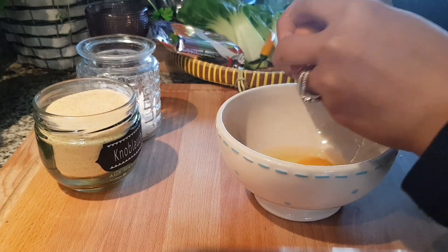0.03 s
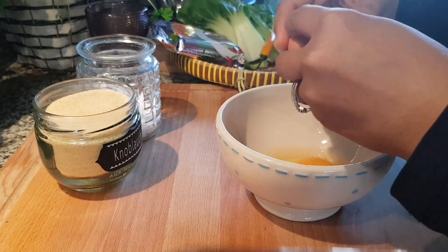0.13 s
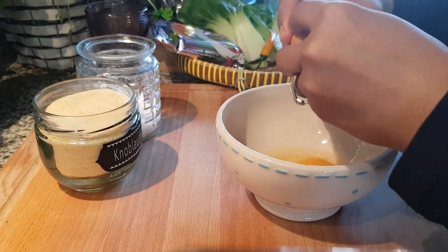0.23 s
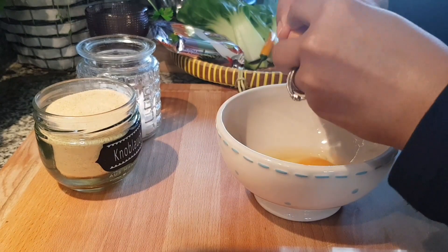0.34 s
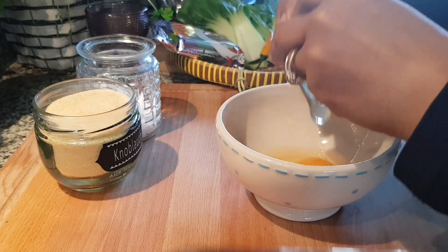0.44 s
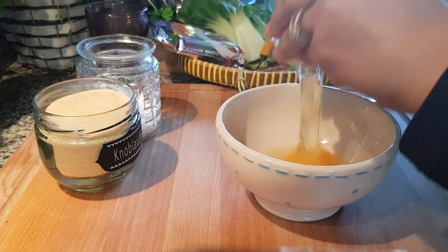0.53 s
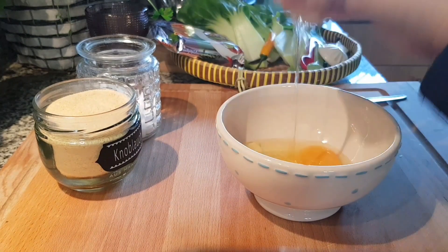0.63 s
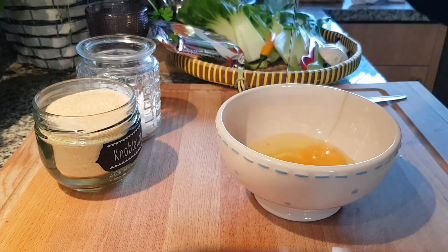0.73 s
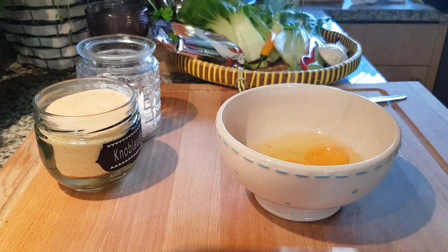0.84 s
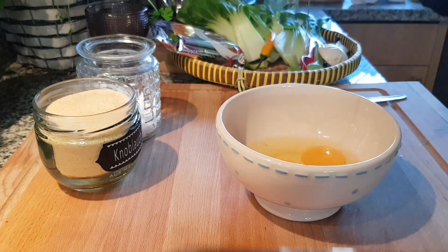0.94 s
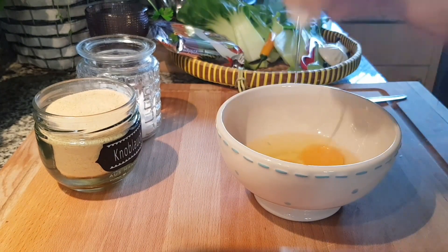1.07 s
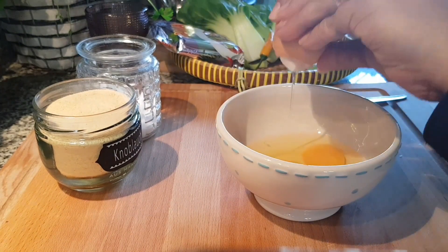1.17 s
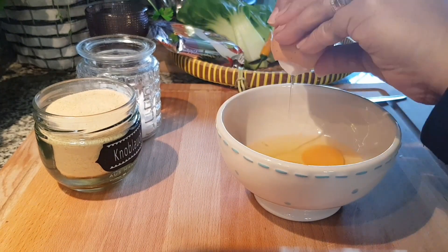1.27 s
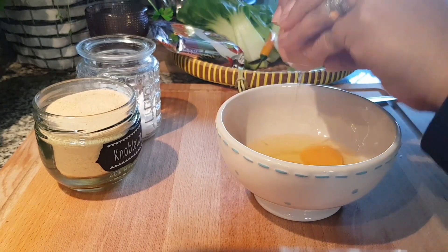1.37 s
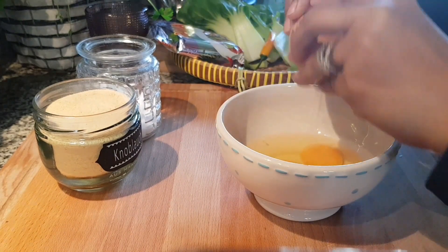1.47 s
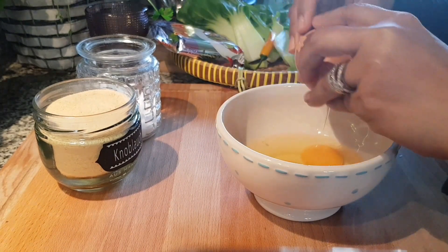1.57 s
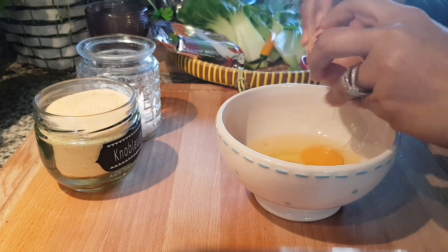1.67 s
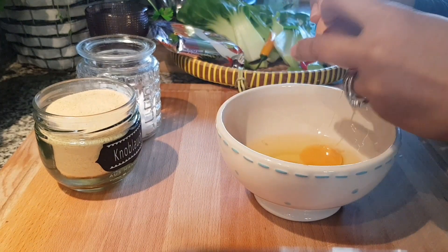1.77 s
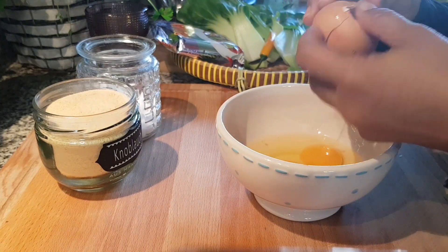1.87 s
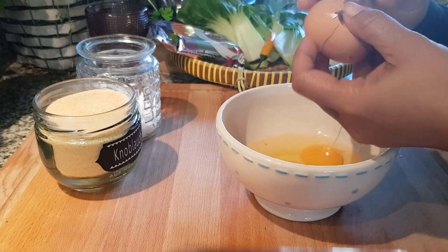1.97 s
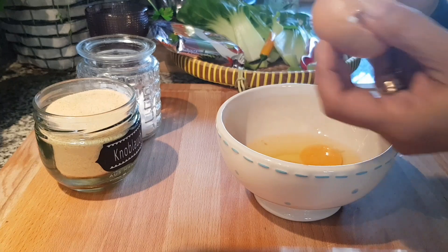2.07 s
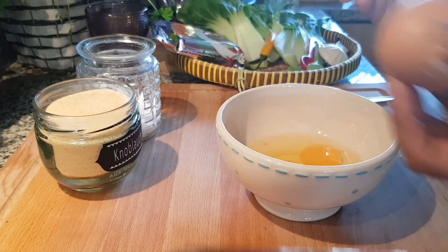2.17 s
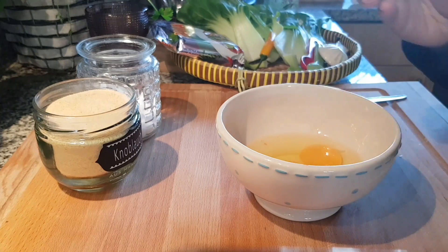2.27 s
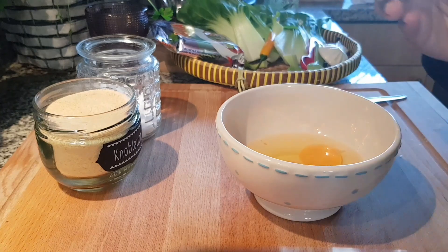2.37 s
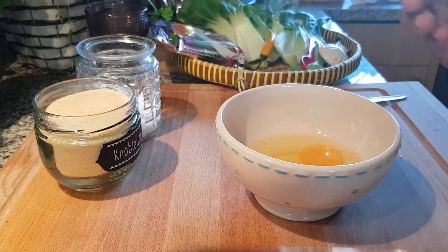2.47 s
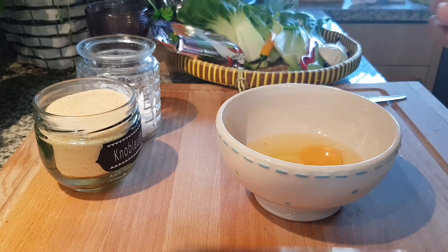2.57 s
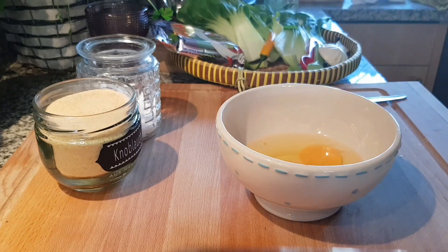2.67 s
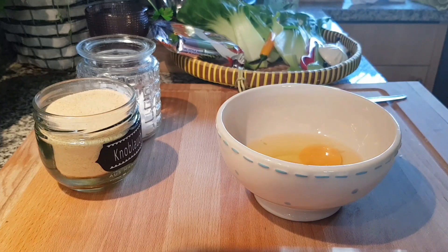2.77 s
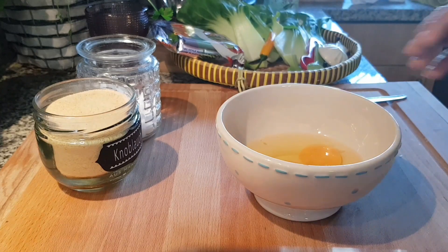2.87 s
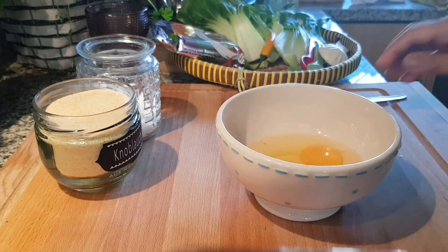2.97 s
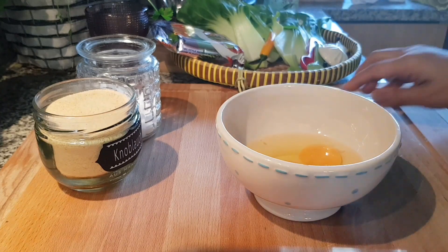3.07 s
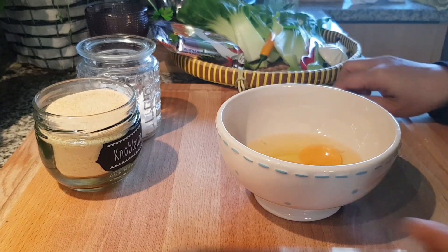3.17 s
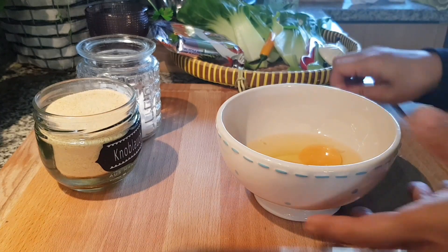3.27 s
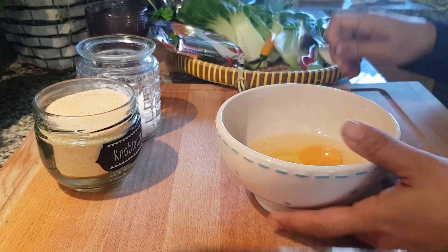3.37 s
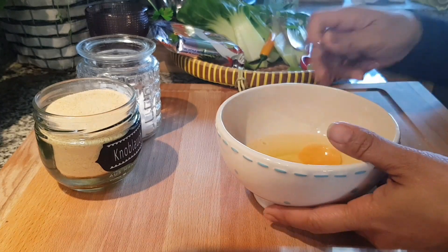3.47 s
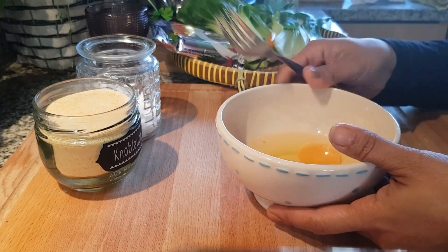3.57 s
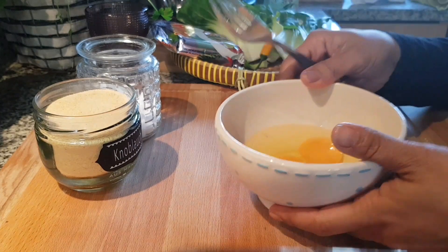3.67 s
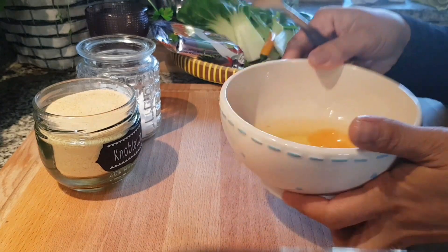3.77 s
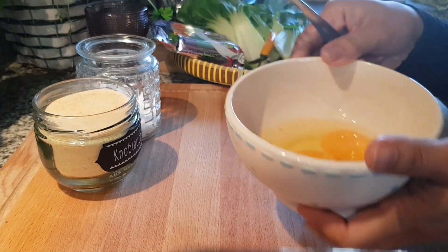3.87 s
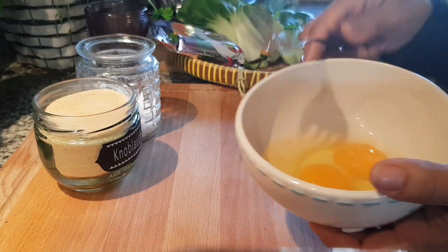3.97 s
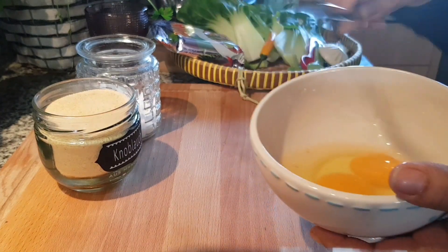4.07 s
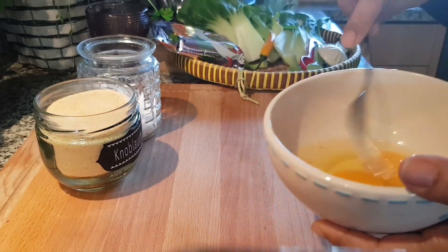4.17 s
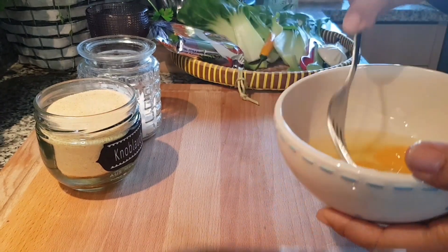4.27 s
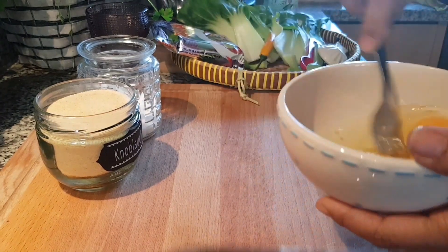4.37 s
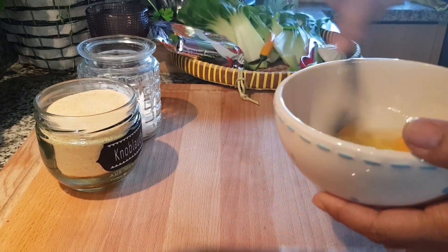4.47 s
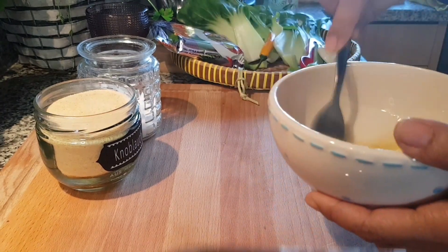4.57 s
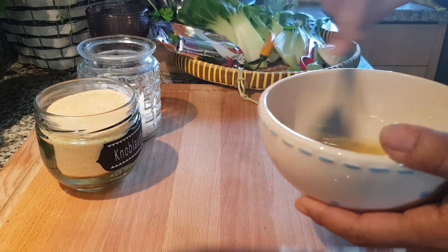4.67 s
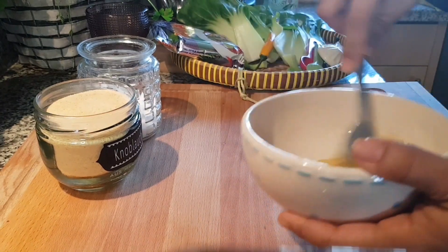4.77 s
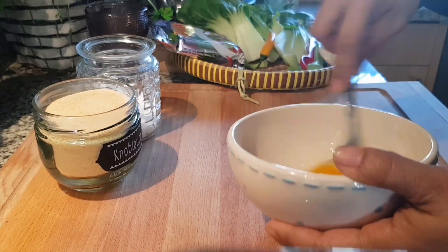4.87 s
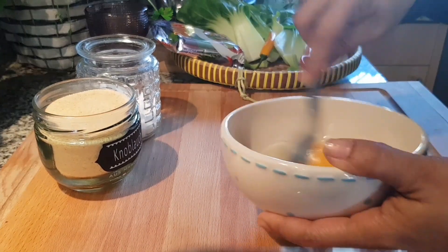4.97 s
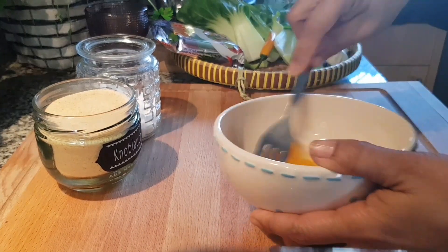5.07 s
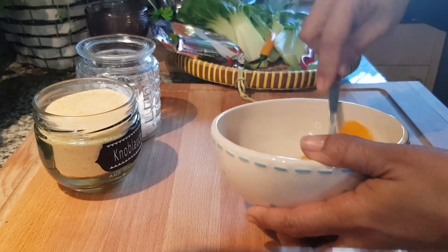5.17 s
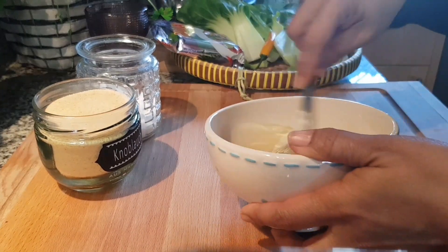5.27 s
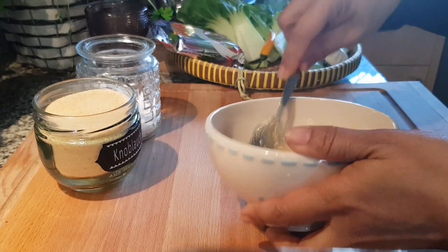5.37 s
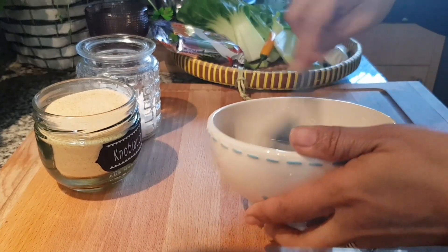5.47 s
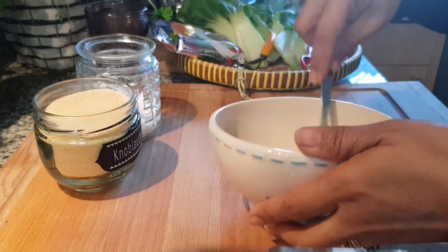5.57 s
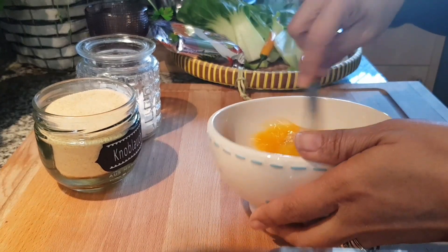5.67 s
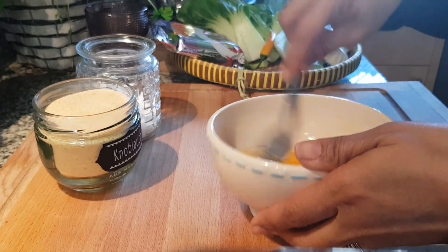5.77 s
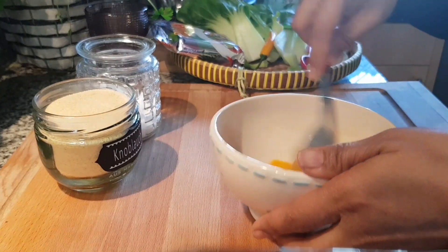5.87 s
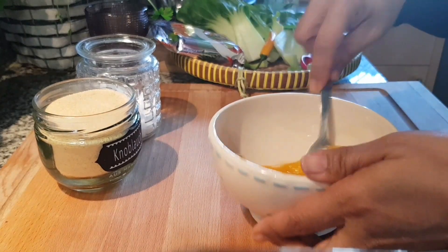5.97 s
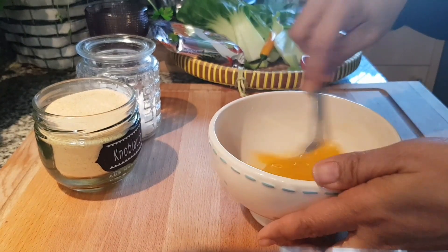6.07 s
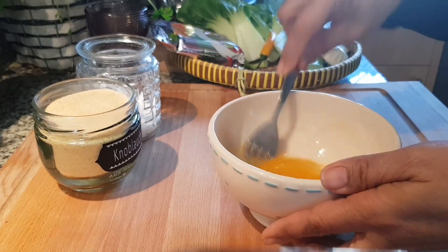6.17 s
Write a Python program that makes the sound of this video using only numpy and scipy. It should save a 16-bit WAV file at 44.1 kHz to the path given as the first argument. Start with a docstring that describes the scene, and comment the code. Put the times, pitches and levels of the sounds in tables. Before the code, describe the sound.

Fingers pull an eggshell apart with small, soft snaps, and the white drains out with a few little plops. Light taps and rubbing follow as the shell is set down. Then a fork beats the eggs in a ceramic bowl, much louder, with fast clicks, scrapes, brief ringing and wet sloshing, while the bowl knocks on a wooden board. Everything is heard close up in a small, quiet kitchen.

```python
"""A fork beats eggs in a ceramic bowl: its tines click, scrape and ring on the glaze, the egg sloshes,
air pockets plop, and the tilted bowl knocks its foot on a wooden board. Before the beating starts,
fingers pull an eggshell apart with small snaps, let the white run out and set the shell down.
All of it is heard from close by in a small, quiet kitchen."""
import sys
import numpy as np
from scipy import signal
from scipy.fft import rfft, irfft
from scipy.io import wavfile

SR = 44100
rng = np.random.default_rng(int(sys.argv[2]) if len(sys.argv) > 2 else 0)


def generate_wav(sig):
    """Save sig (samples, or channels by samples) to the path in sys.argv[1] as 16-bit PCM at SR."""
    pcm = np.round(np.clip(np.atleast_2d(sig).T, -1, 1) * 32767).astype(np.int16)
    wavfile.write(sys.argv[1], SR, pcm)


N = 273861
TIME = np.arange(N) / SR  # seconds since the scene began
AGE = np.arange(int(.3 * SR)) / SR  # seconds since one short sound began

# The tones that fork and bowl ring with: (pitch [Hz], level [dB], fade time [s]).
# A fade time, called t60 in the code, is how long a sound takes to drop by 60 dB.
FORK_TONES = [(2295, -10, .18), (2385, -10, .13), (3060, -10, .13), (3350, -12, .09), (4037, -11, .16),
              (4243, -8, .17), (5000, -10, .12), (5235, -8, .16), (5500, -11, .12), (6050, -6, .12),
              (6204, -6, .13), (6500, -7, .1), (6720, -4, .13), (6775, -2, .18), (7220, -1, .2),
              (7420, -9, .1), (7570, -8, .14), (7916, -3, .17), (8150, -7, .15), (8725, -12, .14),
              (9560, -12, .13), (10230, -12, .13), (10950, -11, .13), (11550, -13, .12), (12810, -14, .11),
              (14520, -14, .11)]
# how strong the lows and highs of a fork in wet egg are: (frequency [Hz], level [dB])
FORK_COLOUR = [(410, -5), (700, -16.5), (971, -11.5), (1120, -5), (1230, 0), (1840, -11.5), (2080, 1.5),
               (2560, -3.5), (3410, -5.5), (4210, -6.5), (4610, -4), (6570, 0), (9110, 1), (14800, 16),
               (16000, 9)]
# the same for eggshell: (frequency [Hz], level [dB])
SHELL_COLOUR = [(290, -60), (500, -9), (1340, -13.5), (1690, -8), (2040, -9.5), (2430, -11), (4090, -7),
                (4800, -5.5), (8090, -15), (14000, -6), (16000, 7)]
# the fork hits or drags along the bowl's wall:
# (time [s], contact length [s], level [dB], clack pitch [Hz], ringing level [dB])
STRIKES = [(4.387, 0.0048, -23.5, 7400, -47), (4.531, 0.019, -38, 7900, -46.5),
           (4.639, 0.0048, -21.5, 7900, -67), (4.774, 0.008, -22, 7000, -66),
           (4.868, 0.012, -33, 5900, -49), (4.892, .004, -17.5, 6500, -29.5),
           (5.037, 0.026, -36, 6460, -46), (5.182, 0.00091, -16.5, 6800, -56),
           (5.314, 0.0054, -30, 5030, -57), (5.382, 0.0024, -32.5, 2680, -52),
           (5.404, 0.0068, -29, 6270, -51), (5.457, 0.0062, -41, 5200, -47),
           (5.578, 0.021, -31.5, 6020, -42.5), (5.724, 0.004, -31, 7940, -69),
           (5.842, 0.0039, -18, 6540, -49), (5.9319, 0.0052, -16.5, 6130, -37),
           (5.982, 0.004, -19.5, 6630, -54), (6.068, 0.039, -33, 6200, -56)]
# the fork's tips flick through the egg, light and bright: (time [s], level [dB])
FLICKS = [(4.37, -46.5), (4.463, -38.5), (4.486, -39), (4.498, -32), (4.627, -46), (4.71, -49),
          (4.735, -52), (4.753, -44), (4.901, -40), (5.022, -38), (5.144, -35.5), (5.281, -36.5),
          (5.397, -38.5), (5.531, -39), (5.555, -36.5), (5.667, -44), (5.679, -40), (5.798, -38.5),
          (5.817, -40), (5.961, -42)]


def undb(db):
    """Turn decibels into a factor to multiply a sound by."""
    return 10 ** (np.asarray(db) / 20)


def unit(x):
    """Scale a sound so that its average strength (rms) is 1."""
    return x / np.sqrt(np.mean(x ** 2))


def colour(x, points, lo_hz=15, hi_hz=20000):
    """Shape a sound by (frequency [Hz], level [dB]) points, cut it below and above, set strength 1."""
    f = np.maximum(np.fft.rfftfreq(x.shape[-1], 1 / SR), 1)
    hz, db = np.transpose(points)
    curve = undb(np.interp(np.log(f), np.log(hz), db))
    edges = ((1 + (lo_hz / f) ** 12) * (1 + (f / hi_hz) ** 12)) ** -.5
    return unit(irfft(rfft(x) * curve * edges, x.shape[-1]))


def noise(width, size=len(AGE)):
    """Stereo noise; width says how much left and right differ."""
    middle, side = rng.standard_normal((2, size))
    return unit(np.array([middle + width * side, middle - width * side]))


def resonate(x, hz, width_hz):
    """Keep the part of a sound near one pitch, at strength 1."""
    b, a = signal.iirpeak(hz, hz / width_hz, fs=SR)
    return unit(signal.lfilter(b, a, signal.lfilter(b, a, x)))


def uneven(x, count=56):
    """Each spot that is hit favours its own random set of frequencies."""
    spectrum = rfft(x)
    ripple_db = 5 * np.clip(rng.standard_normal(count), -2, 2)
    curve_db = np.interp(np.linspace(0, 1, spectrum.shape[1]), np.linspace(0, 1, count), ripple_db)
    return irfft(spectrum * undb(curve_db), x.shape[1])


def contact(length, t60):
    """The force of a hit: it rises fast, holds while the surfaces chatter, then dies away."""
    rise = 1 - np.exp(-AGE / .0005)
    return rise * undb(-60 * np.maximum(AGE - length, 0) / t60)


def swells(moves, attack_s, release_s):
    """Loudness of movements (time [s], length [s], level [dB]) that each rise, hold and die away."""
    power = np.zeros(N)
    for s, length, db in moves:
        i, j = np.searchsorted(TIME, [s - attack_s, s + length + release_s])
        age = TIME[i:j] - s
        rise = np.minimum(1 + age / attack_s, 1) ** 2
        fall = undb(db - 60 * np.maximum(age - length, 0) / release_s)
        power[i:j] += (rise * fall) ** 2
    return np.sqrt(power)


def grains(rate, t60):
    """Tiny bursts of noise at random times, about rate per second, a few much louder than the rest."""
    size = undb(4 * np.minimum(rng.exponential(size=N), 3))
    sparks = (rng.random(N) < rate / SR) * size ** 2
    power = signal.fftconvolve(sparks, undb(-120 * AGE / t60))[:N]
    return np.sqrt(np.abs(power)) * noise(.7, N)


def ring(tones, length, spread, scatter_db):
    """Tones build up during a hit, in a new mix each time; spread puts left and right out of step."""
    hz, db, t60 = np.transpose(tones)[:, :, None]
    size, detune, apart, start = rng.standard_normal((4, len(hz), 1))
    phase = 2 * np.pi * (hz * (1 + .001 * detune) * AGE + start)
    fade = undb(db + scatter_db * size - 60 * np.maximum(AGE - length, 0) / t60)
    channels = [(fade * np.sin(phase + ear * spread * apart)).sum(axis=0) for ear in (1, -1)]
    return np.array(channels) * np.minimum(AGE / length, 1)


def free_tones(favoured_hz, db, drop_db_per_octave, sustain=1.56):
    """Left free, fork and bowl ring longer; tones far from the pitch a touch favours are weaker."""
    tones = [(hz, db - drop_db_per_octave * abs(np.log2(hz / favoured_hz)), sustain * t60)
             for hz, _, t60 in FORK_TONES]
    return [tone for tone in tones if tone[1] > db - 40]


def add(track, s, sound, pan_db=0):
    """Mix a short sound into the track at s seconds; a positive pan_db moves it to the left."""
    i = max(int(s * SR), 0)
    track[:, i:i + len(AGE)] += (sound * undb([[pan_db / 2], [-pan_db / 2]]))[:, :N - i]


def from_left(x, delay_samples=5):
    """A sound from the left reaches the right channel a moment later."""
    return np.array([x[0], np.roll(x[1], delay_samples)])


def background():
    """A low rumble, a wide hiss and the faint hum of an appliance."""
    # the lows and highs of the quiet kitchen: (frequency [Hz], level [dB])
    quiet_colour = [(15, -61), (25, -14.5), (49, 3.5), (70, -8), (102, -0.5), (161, -17.5), (285, -26),
                    (317, -24.5), (659, -27.5), (911, -35), (1520, -40.5), (3820, -54), (6210, -40.5),
                    (7710, -49), (16000, -31.5)]
    rumble = signal.sosfilt(signal.butter(4, 300, fs=SR, output="sos"), noise(.17, N))
    hiss = colour(noise(.6, N), [(20, 0), (20000, 0)], lo_hz=300)
    hum = undb(-72.5) * np.sin(2 * np.pi * 100 * TIME)
    lean_left = undb([[.6], [-.6]])
    return undb(-55.5) * colour(rumble + hiss, quiet_colour) * lean_left + hum


def room(dry):
    """The kitchen's short echo: high sounds die first, and low ones are alike on both sides."""
    # how long the echo lasts: (frequency [Hz], fade time [s])
    fade_times = [(100, 0.24), (500, 0.2), (2000, 0.17), (7000, 0.14), (15000, 0.1)]
    hz, t60 = np.transpose(fade_times)
    f, t, (middle, side) = signal.stft(rng.standard_normal((2, len(AGE))), SR, nperseg=256)
    side = side * np.minimum(f / 600, 1)[:, None]
    fade = undb(-60 * t / np.interp(f, hz, t60)[:, None])
    echo = signal.istft(np.array([middle + side, middle - side]) * fade, SR)[1][:, :len(AGE)]
    echo = colour(echo, [(100, 3), (600, -11), (2000, -11.5), (7000, -10), (16000, -4.5)])
    echo *= np.clip((AGE - .003) / .00067, 0, 1)  # the echo arrives after 3 ms
    return signal.fftconvolve(dry, unit(echo) / np.sqrt(len(AGE)), axes=1)[:, :N]


def hands(attack_s=.052, release_s=.14):
    """Fingers rub, squeezed shell crackles, and the worktop thuds softly under whatever slides."""
    # fingers squeeze and pull at the shell: (time [s], length [s], level [dB])
    squeezes = [(.285, 0.037, -43), (.385, 0.069, -45.5), (.46, 0.073, -50), (.58, 0.018, -48.5),
                (.72, .02, -49.5), (.81, 0.026, -54.5), (1.31, .015, -55), (1.365, 0.031, -48.5),
                (1.47, 0.011, -47), (1.55, .1, -59.5), (1.74, .06, -52), (1.84, 0.037, -52.5),
                (1.92, 0.13, -62.5), (2.67, 0.047, -55.5), (2.94, 0.044, -50)]
    # hands and things slide on the worktop: (time [s], length [s], rubbing [dB], thud [dB])
    slides = [(0.014, 0.17, -50, -59.5), (0.596, 0.075, -51, -63), (0.87, 0.087, -73, -58),
              (2.073, 0.044, -82, -58), (2.33, 0.094, -68, -73), (2.794, 0.024, -40, -46.5),
              (2.915, 0.19, -52, -50.5), (3.116, 0.11, -51.5, -58.5), (3.258, 0.12, -52.5, -58),
              (3.42, 0.11, -63.5, -62.5), (3.765, 0.17, -71, -59), (4.287, 0.17, -75, -59)]
    squeeze = swells(squeezes, attack_s, release_s) + undb(-72.5)  # hands are never quite still
    slide = swells([(s, length, db) for s, length, db, _ in slides], attack_s, release_s)
    weight = swells([(s, length, db) for s, length, _, db in slides], attack_s, release_s)
    rub = colour(grains(rate=600, t60=.046), SHELL_COLOUR, 640, 2690)
    crackle = colour(grains(rate=400, t60=.022), SHELL_COLOUR, 3500, 11330)
    thud = colour(noise(.3, N), [(90, 13.5), (150, -2), (210, -17), (300, -6.5), (700, -17)], 137, 820)
    return (undb(-7.5) * rub * np.hypot(squeeze, slide)
            + crackle * np.hypot(undb(-4.5) * squeeze, undb(-16) * slide)
            + undb(-5.5) * thud * np.hypot(undb(-15.5) * squeeze, weight))


def shell_snaps(snap_s=.002, balanced_hz=3240):
    """The eggshell breaks: small, high-pitched pieces sound crisp, and large, low ones hollow."""
    # each break: (time [s], level [dB], pitch of the piece [Hz])
    snaps = [(.012, -41, 2050), (0.283, -42.5, 5200), (0.369, -37.5, 4560), (0.396, -39, 3700),
             (.418, -36, 3500), (0.472, -43, 1840), (.517, -48, 5050), (0.729, -38, 2800),
             (0.808, -49.5, 5170), (1.218, -46.5, 6140), (1.303, -47, 4000), (1.36, -49, 3700),
             (1.47, -42, 1740), (1.483, -43, 1860), (1.549, -37.5, 1900), (1.848, -40.5, 5100),
             (1.873, -38, 5700), (2.016, -46, 6600), (2.593, -54, 6150), (2.911, -47, 4600)]
    out = np.zeros((2, N))
    for s, db, hz in snaps:
        tilt_db = 18 * np.log2(hz / balanced_hz)
        crack = uneven(noise(.6))
        hollow = colour(crack, SHELL_COLOUR, 900, 3000) * undb(min(-tilt_db, 0)) * contact(snap_s, .032)
        crisp = colour(crack, SHELL_COLOUR, 4500, 11300) * undb(min(tilt_db, 0)) * contact(snap_s, .025)
        piece = resonate(crack, hz, width_hz=900) * undb(-8) * contact(snap_s, .028)
        add(out, s, undb(db) * (hollow + crisp + piece), pan_db=1)
    return out


def worktop_taps():
    """Shell, hand and cutlery touch the worktop, each tap with a pitch of its own."""
    # each touch: (time [s], contact length [s], level [dB], pitch [Hz])
    taps = [(0.733, 0.011, -43.5, 2400), (2.786, 0.013, -60, 905), (2.799, 0.0023, -33, 1410),
            (2.818, 0.0028, -47, 2350), (2.973, 0.0031, -60, 1710), (3.045, 0.0026, -58, 1460),
            (3.132, 0.0027, -48.5, 1670), (3.177, 0.0023, -45.5, 620), (3.241, 0.00091, -36, 1730),
            (3.269, 0.043, -48.5, 890), (3.324, 0.019, -49.5, 1860)]
    # the lows and highs of a tap: (frequency [Hz], level [dB])
    tap_colour = [(88, -40), (150, -6), (229, -53), (296, 1.5), (700, -5), (956, -3), (1880, -6.5),
                  (2260, 0.5), (3260, -14.5), (12000, -39), (15600, -68), (22000, -120)]
    out = np.zeros((2, N))
    for s, length, db, hz in taps:
        touch = colour(noise(.53), tap_colour)
        tap = undb(-2.5) * touch + resonate(touch, hz, width_hz=700)
        add(out, s, undb(db) * tap * contact(length, .029), pan_db=1)
    return out


def draining_shell(start_s=1.37, length_s=.58, level_db=-57):
    """Egg white runs out of the half shell, whose wet hollow rings lower as it empties."""
    full_hz, empty_hz, emptying_s = 1850, 1537, .22
    hz = empty_hz + (full_hz - empty_hz) * np.exp(-np.maximum(TIME - start_s, 0) / emptying_s)
    flutter = colour(grains(rate=200, t60=.02), [(20, 0), (180, -3), (600, -18)], hi_hz=900)
    flow = swells([(start_s, length_s, level_db)], attack_s=.027, release_s=.75)
    return flow * flutter * np.sin(2 * np.pi * np.cumsum(hz) / SR)


def bubble(hz, t60):
    """A short tone that rises in pitch as an air pocket closes."""
    pitch = hz * (1.01 - .1 * np.exp(-AGE / .002))
    return np.sqrt(2) * np.sin(2 * np.pi * np.cumsum(pitch) / SR) * contact(.00071, t60)


def egg_plops(typical_db=-30.5, typical_t60=.048):
    """Air pockets in the egg plop with a small splash; the stronger ones collapse sooner."""
    # each air pocket: (time [s], pitch [Hz], level [dB])
    plops = [(1.404, 1800, -44), (1.474, 1747, -32), (1.483, 1637, -39), (1.55, 1714, -46),
             (1.625, 1665, -44), (4.582, 1125, -45.5), (4.71, 1730, -33.5), (4.776, 1980, -27),
             (4.894, 2040, -22), (4.902, 1584, -21), (4.997, 2114, -34), (5.384, 2476, -25.5),
             (5.461, 1222, -36.5), (5.503, 1280, -33), (5.558, 1823, -32), (5.64, 2003, -41),
             (5.818, 2133, -32.5)]
    out = np.zeros((2, N))
    for s, hz, db in plops:
        splash = resonate(noise(.5), hz, width_hz=900) * contact(.003, .035)
        t60 = typical_t60 * undb(.32 * (typical_db - db))
        add(out, s, undb(db) * (bubble(hz, t60) + undb(-12) * splash), pan_db=1)
    return out


def egg_churn(bubble_count=80, steady_db=-51.5):
    """The beaten egg bubbles, crackles wetly and sloshes, loudest after long drags of the fork."""
    drag_s, drag_db, hold_s = .024, -47, .026  # a drag lasting drag_s makes a surge of drag_db
    first, last = FLICKS[1][0], STRIKES[-1][0]
    surges = [(s, length + hold_s, drag_db + 20 * np.log10(length / drag_s))
              for s, length, *_ in STRIKES[1:]]
    churn = swells([(first, last - first, steady_db)] + surges, attack_s=.06, release_s=.081)
    bubbles = np.zeros((2, N))
    for when, pitch_step, softness, side in rng.random((bubble_count, 4)):
        s = first + when * (last - first)
        gain = np.interp(s, TIME, churn) * undb(3 - 14 * softness)
        add(bubbles, s, gain * bubble(1100 * 2.7 ** pitch_step, t60=.03), pan_db=8 * (side - .5))
    # the lows and highs of the heaving egg: (frequency [Hz], level [dB])
    slosh_colour = [(130, 4), (300, -0.5), (600, 0), (1000, -2)]
    crackle = colour(grains(rate=220, t60=.028), FORK_COLOUR, 450, 8600)
    slosh = undb(-12) * colour(grains(rate=120, t60=.14), slosh_colour, 104, 730)
    return bubbles + churn * (crackle + slosh)


def bowl():
    """The bowl's foot knocks on the board and passes on the fork's strikes; let go, the rim sings."""
    # the foot hits the board: (time [s], contact length [s], level [dB])
    knocks = [(5.049, 0.0056, -18.5), (5.158, 0.0024, -15), (5.239, 0.0047, -31), (6.052, 0.016, -21.5),
              (6.075, 0.039, -29), (6.104, 0.0064, -31.5)]
    # the lows and highs of the wooden thud: (frequency [Hz], level [dB])
    knock_colour = [(35, -44), (60, 5), (202, -15), (437, -10), (678, -1), (794, -7), (1190, -3.5),
                    (1420, -15.5), (1780, -5.5), (2240, -23), (2860, -23.5), (4000, -27), (5200, -73),
                    (8800, -120)]
    # the tones of bowl and board together: (pitch [Hz], level [dB], fade time [s])
    board_tones = [(110, -21, .2), (155, -16, .15), (259, -10, .16), (383, -15, .1), (646, -5, .11),
                   (789, 0, .11), (833, -3, .09), (921, -2, .11), (1066, -3, .07), (1815, -9, .05)]
    # touches that leave bowl or fork ringing: (time [s], favoured pitch [Hz], level [dB])
    rim_touches = [(3.425, 4040, -62), (4.388, 4150, -41), (4.388, 7570, -40), (4.464, 9560, -43),
                   (4.641, 5235, -39), (5.406, 4100, -36), (5.406, 2400, -35), (5.933, 2400, -29),
                   (5.933, 4245, -33), (6.126, 2280, -30)]
    lands_s = knocks[0][0]
    held_db, resting_db = -24.5, -12  # strikes thump harder once the foot has met the board
    thumps = [(s, length, db + (resting_db if s > lands_s else held_db))
              for s, length, db, *_ in STRIKES]
    out = np.zeros((2, N))
    for s, length, db in knocks + thumps:
        thud = colour(noise(.35), knock_colour, lo_hz=125) * contact(length, .032)
        body = ring(board_tones, length, spread=.5, scatter_db=1.5)
        add(out, s, undb(db) * (undb(-2) * thud + undb(-4) * body), pan_db=-1.5)
    for s, favoured_hz, db in rim_touches:
        tones = free_tones(favoured_hz, db, drop_db_per_octave=142)
        add(out, s, ring(tones, length=.001, spread=.99, scatter_db=1.5))
    return out


def fork_hit(s, length, db, edge_db, clack_hz, ring_db):
    """The tines chatter on the glaze, slap the egg and ring on; the spot they hit sets the clack's pitch."""
    # how much egg coats fork and wall: (time [s], a firm hit's wet slap compared with its click [dB])
    wetness = [(4.38, -37), (4.5, -16.5), (4.64, -12), (5.03, -2), (5.33, -12.5), (5.42, -4.5), (5.75, -12),
               (5.93, 1), (6.07, -1.5)]
    firm_db, slap_growth = -25.5, .49  # the slap gains only about half a dB for each dB of the hit
    slap_db = np.interp(s, *np.transpose(wetness)) + (slap_growth - 1) * (db - firm_db)
    chatter = uneven(noise(.7))
    slap = colour(chatter, FORK_COLOUR, 695, 2590) * undb(slap_db) * contact(length, .02)
    click = colour(chatter, FORK_COLOUR, 3100, 8240) * contact(length, .019)
    # the two cuts overlap, leaving a thin, bright edge near 12 kHz
    edge = colour(chatter, FORK_COLOUR, 12700, 11300) * undb(edge_db) * contact(length, .026)
    clack = undb(-1) * resonate(noise(.85), clack_hz, width_hz=510) * contact(length, .024)
    tines = ring(FORK_TONES + [(clack_hz, -4, .13)], length, spread=.9, scatter_db=3.5)
    return undb(db) * (slap + click + edge + clack) + undb(ring_db) * tines


def fork(pan_db=1.1):
    """The fork jingles as it is picked up, then strikes the wall and flicks through the egg by turns."""
    # soft jingles: (time [s], level [dB])
    jingles = [(3.426, -71), (3.462, -69.5), (3.616, -67.5), (3.829, -73.5), (3.919, -78), (3.98, -80)]
    out = np.zeros((2, N))
    for s, db in jingles:
        tones = free_tones(favoured_hz=5700, db=db, drop_db_per_octave=12)
        add(out, s, ring(tones, length=.004, spread=1, scatter_db=-.5))
    for s, length, db, clack_hz, ring_db in STRIKES:
        strike = fork_hit(s, length, db, edge_db=-20.5, clack_hz=clack_hz, ring_db=ring_db)
        add(out, s, strike, pan_db)
    for s, db in FLICKS:
        flick = fork_hit(s, length=.0051, db=db, edge_db=3, clack_hz=7150, ring_db=db - 11)
        add(out, s, flick, pan_db)
    return out


def scene():
    """Everything on the board, its echo in the kitchen and the quiet behind it."""
    beating = fork() + egg_plops() + egg_churn()
    cracking = shell_snaps() + worktop_taps() + draining_shell() + hands()
    dry = beating + cracking + from_left(bowl())
    return dry + undb(-6) * room(dry) + background()


def record(dry):
    """The phone that listens cuts off the very highest sounds."""
    top_hz = 15800
    return signal.sosfilt(signal.ellip(8, .2, 70, top_hz, fs=SR, output="sos"), dry)


dry = scene()
out = record(dry)
generate_wav(out)
```